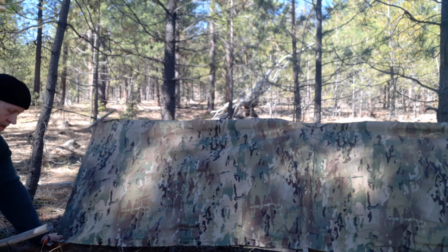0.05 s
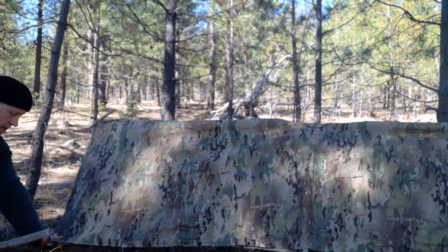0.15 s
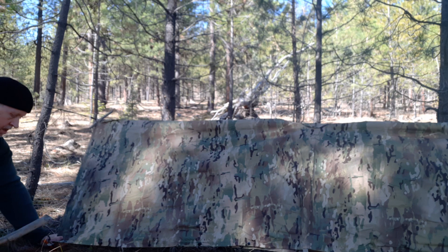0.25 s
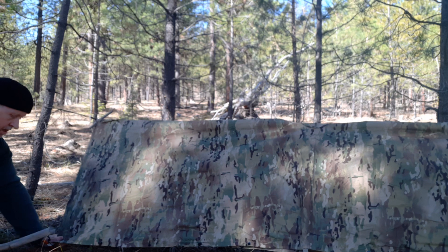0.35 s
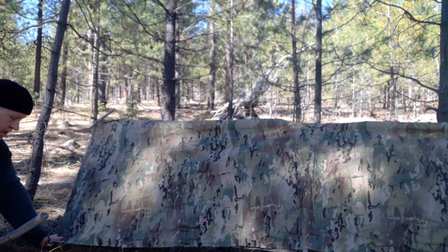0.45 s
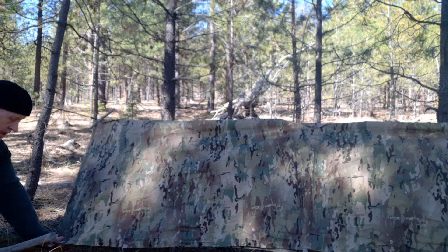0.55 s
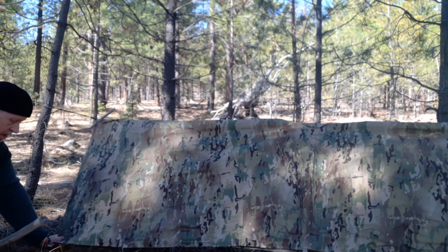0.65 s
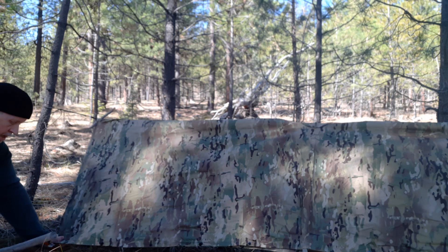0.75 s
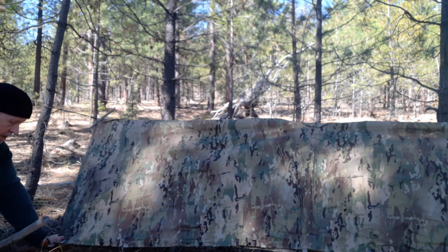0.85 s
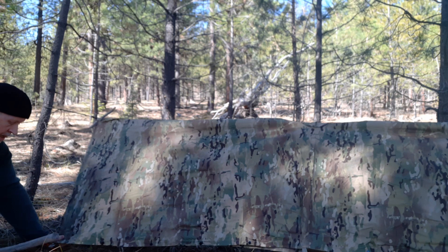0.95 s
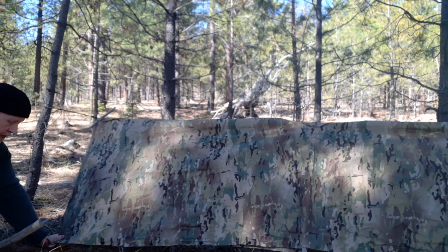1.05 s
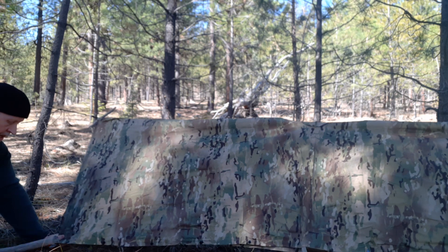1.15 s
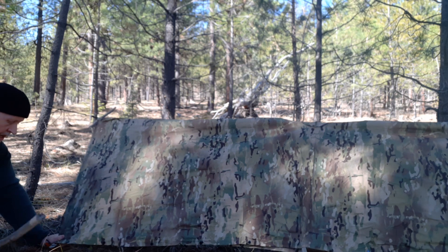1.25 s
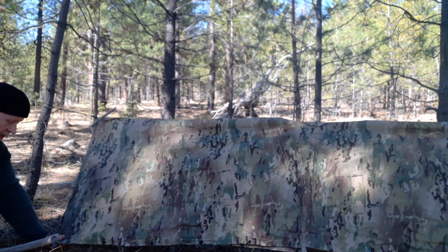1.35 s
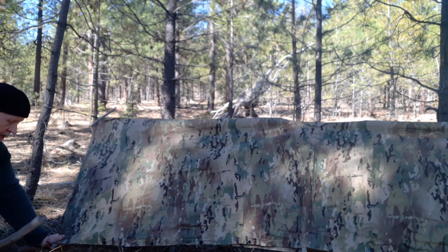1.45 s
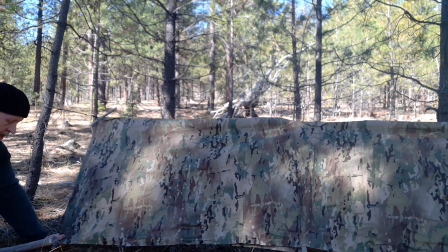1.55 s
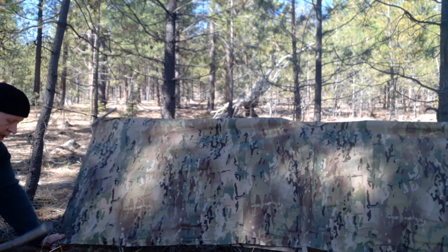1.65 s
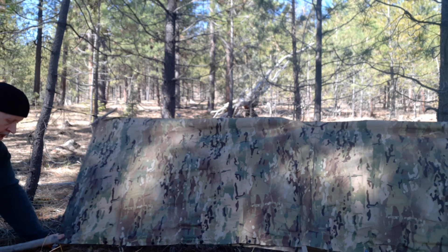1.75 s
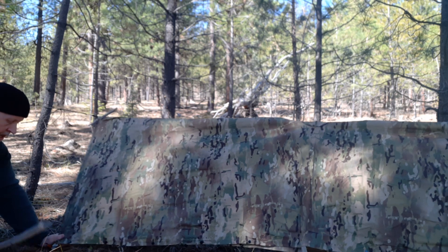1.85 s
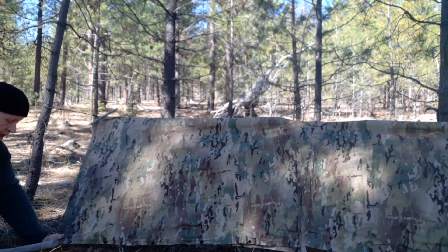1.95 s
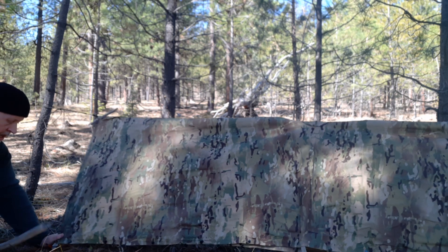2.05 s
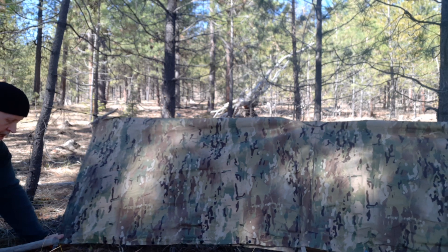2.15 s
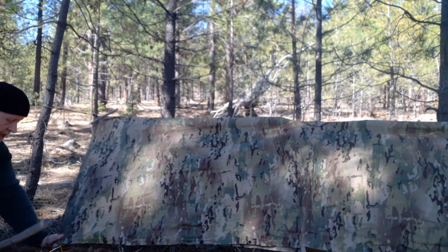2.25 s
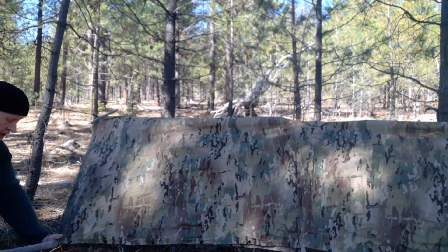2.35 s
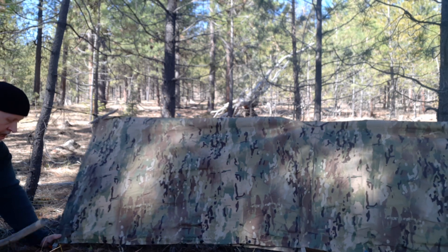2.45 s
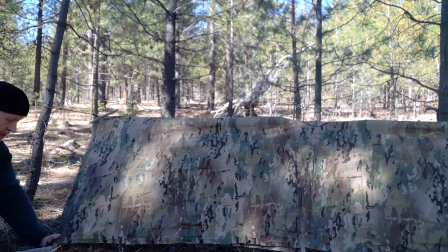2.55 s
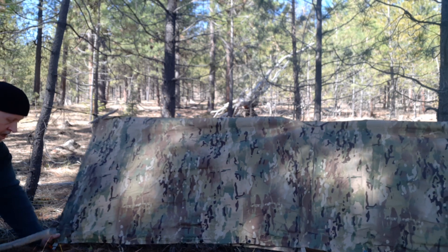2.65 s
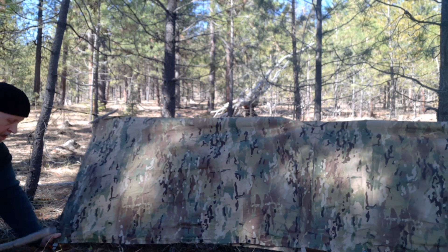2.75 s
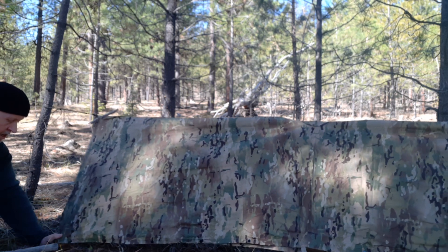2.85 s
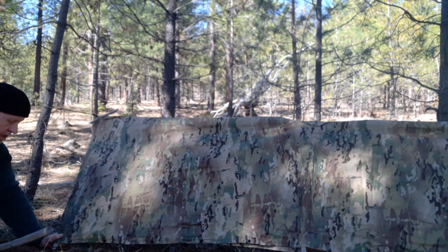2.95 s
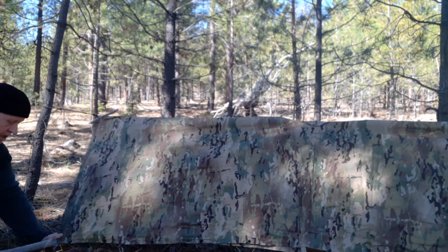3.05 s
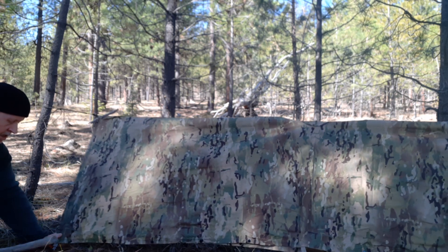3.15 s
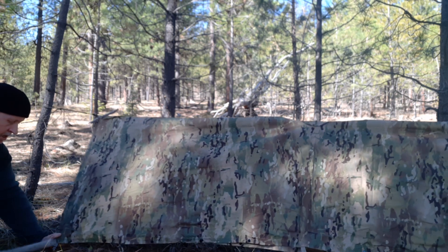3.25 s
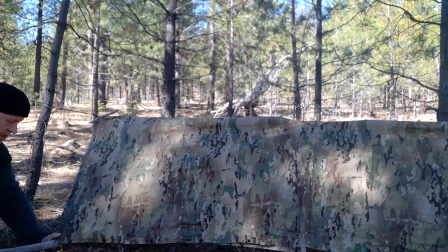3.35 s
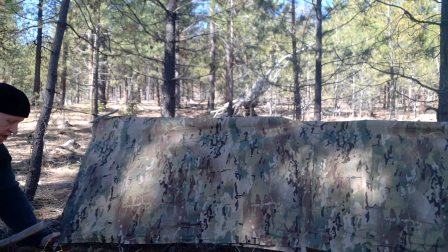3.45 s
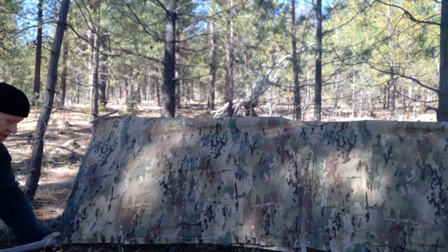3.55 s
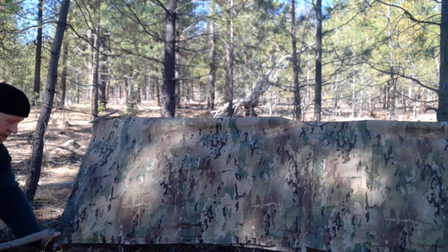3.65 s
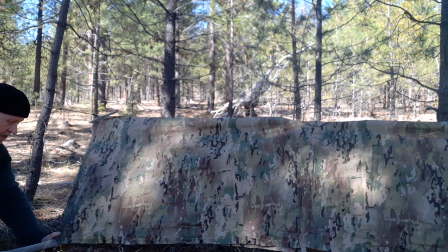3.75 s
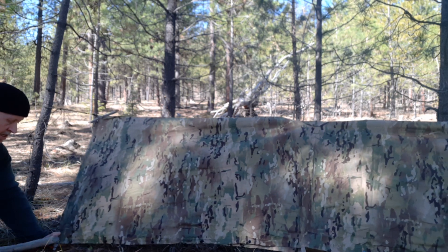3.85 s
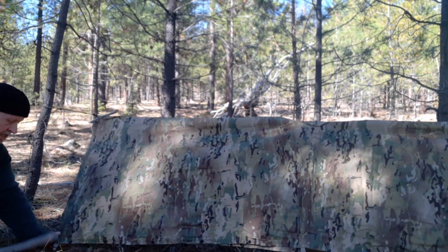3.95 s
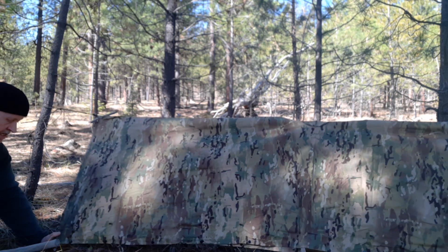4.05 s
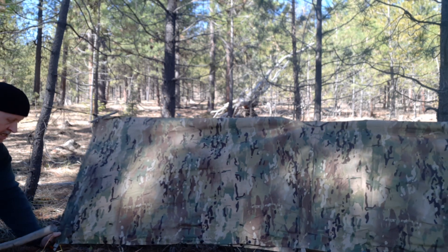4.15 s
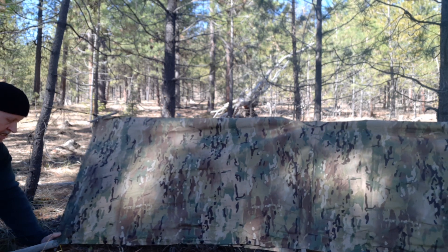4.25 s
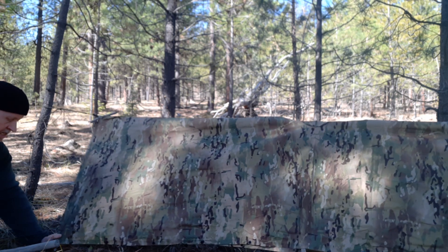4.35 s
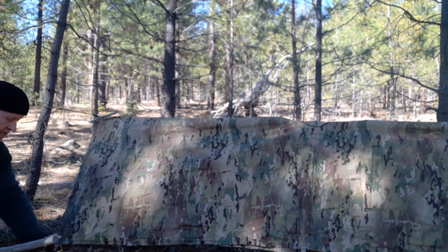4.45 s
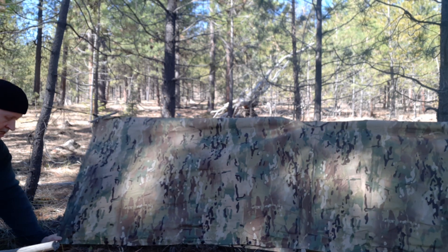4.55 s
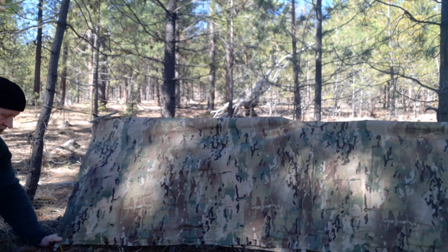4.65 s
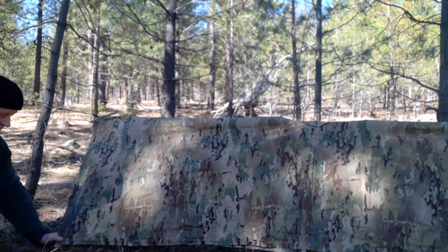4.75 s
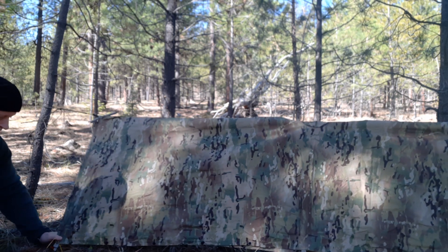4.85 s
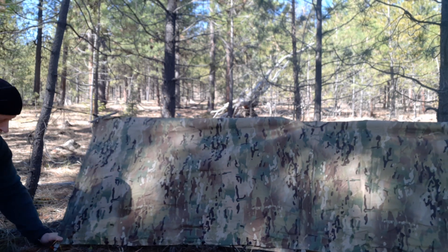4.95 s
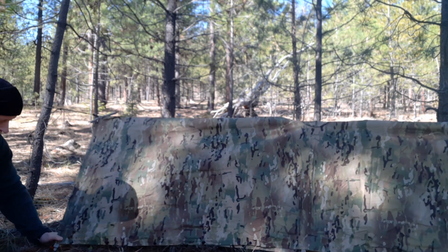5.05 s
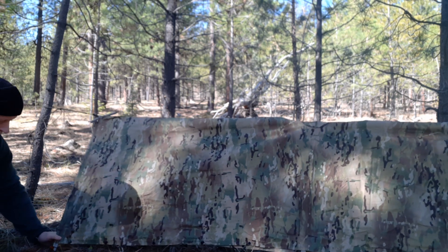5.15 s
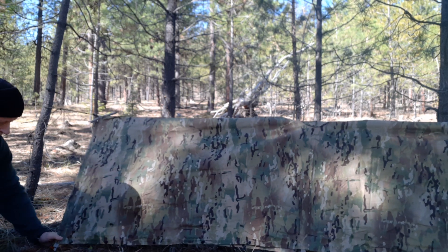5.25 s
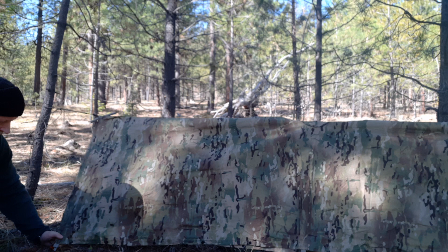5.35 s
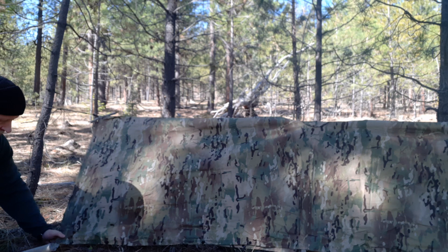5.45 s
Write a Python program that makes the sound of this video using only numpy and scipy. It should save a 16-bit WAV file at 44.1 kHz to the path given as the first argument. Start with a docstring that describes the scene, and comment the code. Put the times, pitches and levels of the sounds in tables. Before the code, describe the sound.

Quick, steady wooden knocks with sharp cracks and dull thuds drive a tent stake into the ground over a light wind rumble.

```python
"""Quick, even knocks, a little to the right: a wooden club drives a tent stake into forest soil.
Each blow is a wooden knock, a splintery crack and a falling thud of the ground. Harder contacts are
shorter, and the crack tightens once the stake sits deep. A shifting overtone colours the crack, the
stake rings briefly, grit patters down and the club sometimes drops back in a light tap. Trunks scatter
a short echo, wind buffets and thumps the microphone, a sleeve swishes and cloth rustles faintly."""
import sys
import numpy as np
from scipy import signal
from scipy.fft import rfft, irfft, next_fast_len
from scipy.io import wavfile
from scipy.ndimage import map_coordinates

SR = 44100
rng = np.random.default_rng(int(sys.argv[2]) if len(sys.argv) > 2 else 0)


def waveform_to_disk(signal):
    """Save audio, clipped to [-1, 1], as 16-bit WAV at the path in sys.argv[1]."""
    frames = np.transpose(np.atleast_2d(signal))
    scaled = np.clip(frames, -1, 1) * 32767
    samples = np.round(scaled).astype(np.int16)
    wavfile.write(sys.argv[1], SR, samples)


N = 242991
LENGTH = 16384  # samples in one blow
T = np.arange(LENGTH) / SR
HZ = np.fft.rfftfreq(LENGTH, 1 / SR)
SOFT_BELOW_DB = 1.5  # a contact with less hardness than this counts as soft

# blows of the club; hardness is how much louder the crack is than the knock
# (time [s], knock level [dB], hardness [dB], thud level [dB], overtone of the stake [Hz])
BLOWS = [(0.37, -53.5, 5, -52.5, 5850), (0.567, -38.5, 3.5, -49, 5550), (0.7717, -37, 1, -46, 5600),
         (0.971, -37.5, 1.5, -44, 5400), (1.155, -34, 1, -41.5, 5290), (1.3547, -35, 3.5, -43, 5260),
         (1.5506, -34, 3, -43.5, 5800), (1.734, -34, 4, -43, 5490), (1.9381, -33, 3.5, -39, 5500),
         (2.1405, -35, 3.5, -41.5, 5330), (2.3438, -34, 3.5, -37, 5100), (2.5735, -38, 0, -35.5, 4400),
         (2.5864, -40.5, 3, -44, 3680), (2.8398, -45.5, 1, -38, 5540), (3.0908, -37, 7.5, -40.5, 6850),
         (3.3144, -36, 9.5, -41.5, 6920), (3.5477, -34.5, 4.5, -37.5, 5670),
         (3.7805, -36.5, 9, -42.5, 5290), (4.0215, -35, 6.5, -39, 5500), (4.2743, -34, 7.5, -38, 5250)]
# tone of the dry hiss of cloth, grit and needles (frequency [Hz], level [dB])
RUSTLE = [(1470, -55), (2500, -24), (3980, -7), (5690, -3), (7590, -1.5), (8600, -16.5), (11700, -1),
          (15000, 1), (16000, -31.5)]


def hammering(contact_t60=0.038, shorter_per_db=0.29, tap_t60=0.0054, firm_from_s=2.7):
    """The club hits the stake, first in loose soil, then in firm; harder contacts are shorter."""
    # light taps as the club glances off or drops back (time [s], knock level [dB], hardness [dB])
    rebounds = [(0.3723, -55.5, 9.5), (0.633, -63.5, -1), (1.5545, -48.5, 13.5), (1.78, -57, -11.5),
                (1.969, -53.5, -3), (2.184, -50.5, -3), (2.37, -48, -3), (3.3397, -48, 0.5),
                (3.7939, -48, 2), (4.085, -60, -12)]
    hits = []
    for s, knock_db, hardness_db, thud_db, overtone_hz in BLOWS:
        t60 = contact_t60 * np.exp(-shorter_per_db * max(hardness_db, SOFT_BELOW_DB))
        hits.append((s, t60, knock_db, hardness_db, thud_db, overtone_hz))
    for s, knock_db, hardness_db in rebounds:
        overtone_hz = min(BLOWS, key=lambda blow: abs(blow[0] - s))[-1]  # from the nearest blow
        thud_db = knock_db - hardness_db / 2  # a glancing tap shakes the soil less
        hits.append((s, tap_t60, knock_db, hardness_db, thud_db, overtone_hz))
    out = np.zeros((2, N))
    lead = 256  # samples of room ahead of each hit
    for s, *hit in hits:
        add(out, s - lead / SR, np.roll(strike(s > firm_from_s, *hit), lead, axis=1))
    return out


def strike(firm, t60, knock_db, hardness_db, thud_db, overtone_hz):
    """One contact knocks on the wood, cracks and snaps at the stake's head and shakes the soil."""
    tones = wood_tones(firm, hardness_db, overtone_hz)
    crush = contact(t60, rise=0.035, impact=0, bite=amp(-7))
    push = contact(t60 * 0.086, rise=0, impact=2.8)
    snap_db = (-9.5 if firm else -7) - 0.84 * max(SOFT_BELOW_DB - hardness_db, 0)  # soft hits snap less
    gains = amp(knock_db + np.array([0, hardness_db, hardness_db + snap_db]))  # knock, crack, snap
    ground = amp(thud_db) * thud(firm)
    blow = sum(g * set_energy(part) for g, part in zip(gains, irfft(tones * [push, crush, crush])))
    # the echo mixes all directions, so only the tone of the wood is left in it
    radiated = sum(g * set_energy(part) for g, part in zip(gains, irfft(tones)))
    return direct(blow + ground) + forest_echo(radiated + ground) + amp(knock_db) * stake_ring(firm)


def contact(t60, rise, impact, bite=0, bite_at=0.05, rub_db=-24, rub_t60=0.04):
    """Spectrum of a blow's force: an impact, fibres crushing, then the shaft rubbing into the soil."""
    build_up = 1 - np.exp(-T / (rise * t60 + 1 / SR))  # rise and bite_at are shares of t60
    force = rng.standard_normal(LENGTH) * (fade(T, t60) + amp(rub_db) * fade(T, rub_t60)) * build_up
    force[0] += impact
    fibres_give_way = bite * np.linalg.norm(force) * np.exp(-2j * np.pi * HZ * bite_at * t60)
    return rfft(force) + fibres_give_way


def wood_tones(firm, hardness_db, overtone_hz, knock_top_hz=2370):
    """How strongly club and stake answer at each frequency, for the knock, the crack and the snap."""
    # notes at which club and stake ring (frequency [Hz], width [Hz], level [dB])
    wood_notes = [(687, 170, -9), (930, 130, -0.5), (1076, 610, -3.5), (1453, 79, -1), (1505, 75, 3),
                  (1977, 425, 4.5), (2082, 89, 6)]
    # tone of the crack in loose soil and in firm soil (frequency [Hz], level [dB])
    crack_loose = [(1600, -53), (2380, -3), (2660, -7.5), (3000, 0.5), (3230, -6.5), (3750, -1),
                   (4420, -4.5), (5300, -3), (6300, -1.5), (7900, -6), (8600, -20.5), (11000, -46)]
    crack_firm = [(1500, -42.5), (2300, -5), (2850, -10.5), (3200, -7), (4200, -8), (5000, -4.5),
                  (6200, -6.5), (7100, -2.5), (7900, -10.5), (8600, -22), (11000, -57.5)]
    # tone of the high snap (frequency [Hz], level [dB])
    snap_tone = [(6500, -46), (8700, -9), (10000, -3), (11400, 4), (13500, -3), (15500, -5), (16800, -28)]
    wood = sum((-1) ** k * amp(db) * resonance(hz, width) for k, (hz, width, db) in enumerate(wood_notes))
    # the blunt club face cannot drive the knock's high notes
    blunt = signal.freqs(*signal.butter(8, 1, analog=True), HZ / knock_top_hz)[1]
    slope = 1 + 1j * HZ  # a positive power of this brightens, a negative one deepens
    knock = wood * blunt * slope ** (-0.11 if firm else 0.23)
    overtone = amp(-4) * resonance(overtone_hz, width_hz=280)
    crack = struck_tone(crack_firm if firm else crack_loose) * (1 + overtone)
    if firm:
        crack *= slope ** (0.0523 * hardness_db)  # harder hits are brighter
    return np.array([knock, crack, struck_tone(snap_tone)])


def thud(firm, rise_s=0.006, detune=0.05):
    """The ground swings a few times, falling in pitch as the push spreads into it."""
    # notes of the earth packed against the shaft (frequency [Hz], level [dB], time to fade 60 dB [s])
    soil_notes = [(270.2, -4, 0.036), (394, -18.5, 0.049)]
    first_hz, last_hz, glide_s, t60 = (265, 45, 0.012, 0.053) if firm else (235, 58, 0.01, 0.082)
    pitch = last_hz + (first_hz - last_hz) * np.exp(-T / glide_s)
    pitch *= 1 + detune * rng.standard_normal()
    swings = np.sin(2 * np.pi * np.cumsum(pitch) / SR) * fade(T, t60)
    for hz, db, note_t60 in soil_notes:
        hz *= 1 + detune * rng.standard_normal()
        swings -= amp(db) * np.sin(2 * np.pi * hz * T) * fade(T, note_t60)
    return set_energy(swings * (1 - np.exp(-(T / rise_s) ** 2)))


def stake_ring(firm, firm_db=-6, scatter_db=0.5, count=160):
    """Crowds of close notes hang on after the blow as a dry rasp; firm soil makes them quieter."""
    # the stake's lingering ring (centre [Hz], spread [Hz], level [dB], time to fade 60 dB [s])
    clusters = [(2037, 110, -17.5, 0.17), (2870, 170, -25, 0.23), (5130, 230, -22, 0.3)]
    out = np.zeros((2, LENGTH))
    for hz, spread_hz, db, t60 in clusters:
        notes_hz = hz + spread_hz * rng.standard_normal(count)
        strengths = rng.standard_normal((2, count)) + 1j * rng.standard_normal((2, count))
        spectrum = np.zeros((2, len(HZ)), complex)
        spectrum[:, np.searchsorted(HZ, notes_hz)] = strengths
        out += amp(db + scatter_db * rng.standard_normal()) * unit(irfft(spectrum)) * fade(T, t60)
    return amp(firm_db * firm) * out * (1 - T / T[-1])


def direct(x, lag_s=0.00021):
    """The blow reaches the left side of the microphone later and duller."""
    # balance between the sides (frequency [Hz], left minus right [dB])
    shade = [(100, -3.5), (900, -5.5), (1600, -4), (4400, -6.5), (15000, -13)]
    delay = np.exp(-2j * np.pi * HZ * np.array([[lag_s], [0]]))
    return irfft(rfft(x) * delay * panned(along(shade, HZ)))


def forest_echo(x, rise_s=0.00054, near_gain=4.5, near_t60=0.016, uneven_db=2.5):
    """The tarp and ground echo at once, the trunks later, in clumps that are new for every blow."""
    # how long the echo lasts (frequency [Hz], time to fade 60 dB [s])
    echo_times = [(150, 0.42), (700, 0.21), (5000, 0.19), (13000, 0.17)]
    # how strong the echo is (frequency [Hz], level [dB])
    echo_tone = [(100, -25), (300, -6.5), (700, -0.5), (1600, -11.5), (3500, -6), (7000, -8.5), (15000, -7)]
    # how alike its left and right sides are (frequency [Hz], likeness [0 to 1])
    likeness = [(300, 0.99), (640, 0.82), (1400, 0.44), (3000, 0.024)]
    hz, t, hiss = signal.stft(rng.standard_normal((2, LENGTH)), SR, nperseg=256)
    clumps = amp(uneven_db * (rng.standard_normal(len(t)) + rng.standard_normal((len(hz), 1))))
    decay = fade(t, along(echo_times, hz)[:, None])
    tail = signal.istft(hiss * clumps * decay, SR, nperseg=256)[1][:, :LENGTH]
    tail *= (1 - np.exp(-(T / rise_s) ** 2)) * (1 + near_gain * fade(T, near_t60))
    spread = np.arccos(along(likeness, HZ)) / 2
    mid, side = rfft(tail / np.linalg.norm(tail[0])) * [np.cos(spread), np.sin(spread)]
    return irfft(rfft(x) * amp(along(echo_tone, HZ)) * [mid + side, mid - side])


def grit(count=6, mean_flight_s=0.019, t60=0.0049, pan_db=-6):
    """Bits of soil and dry needles patter down after each blow, the later ones softer."""
    envelope = np.zeros(N)
    for s, knock_db, *_ in BLOWS:
        for flight in rng.gamma(2, 1 / 2, count):
            add(envelope, s + mean_flight_s * flight, amp(knock_db - 17 - 3 * flight) * fade(T, t60))
    return envelope * noise(RUSTLE) * panned(pan_db)


def wind(gain_db=-2, eddy_db=5, eddies_per_s=16):
    """Swirls of air buffet each microphone opening on its own; strong gusts add a higher churn."""
    # gusts (time [s], level before gain_db [dB], left minus right [dB])
    gusts = [(0.0, -37, -18.5), (0.11, -64, 4), (0.21, -44.5, -14), (0.32, -68.5, 5), (0.74, -52.5, -32),
             (0.86, -42, -29), (1.15, -43, -8.5), (1.45, -52, -8.5), (2.09, -51, 10.5), (2.37, -52, -14.5),
             (2.5, -40, 8), (2.91, -48.5, 2), (3.97, -60, 2), (4.41, -53.5, -8.5), (4.46, -46.5, -34.5),
             (4.56, -83.5, 8), (4.66, -48, -28), (4.92, -44.5, -33), (4.97, -79.5, -1.5),
             (5.06, -36, -14.5), (5.13, -71, -9), (5.27, -43.5, -38.5), (5.51, -54, -1)]
    # tone of the deep buffeting and of a strong gust's small swirls (frequency [Hz], level [dB])
    buffet_tone = [(22, -23), (38, -10), (52, 4), (75, -1), (100, -5.5), (135, -21.5), (210, -34.5),
                   (400, -45), (900, -110)]
    churn_tone = [(60, -25), (120, 2), (200, -11.5), (300, -21), (600, -59)]
    buffet_db, pan_db = curves(gusts)
    eddies = amp(eddy_db * np.array([wobble(eddies_per_s), wobble(eddies_per_s)]))
    peak_db = buffet_db.max()
    churn_db = peak_db - 14.5 + 2.2 * (buffet_db - peak_db)  # drops away fast as the wind eases
    buffet = amp(buffet_db) * unit(eddies * noise(buffet_tone))
    churn = amp(churn_db) * unit(eddies * noise(churn_tone))
    return panned(pan_db) * (amp(gain_db) * (buffet + churn) + wind_thumps())


def wind_thumps(half_cycles=0.61):
    """Each large swirl of air gives the microphone one short swing of pressure."""
    # large swirls (time [s], level [dB], pitch [Hz])
    swirls = [(0.844, -37.5, 72), (0.877, -36, 75), (0.901, -37, 90.5), (1.008, -32, 72.4),
              (1.035, -38.5, 116), (1.06, -41.5, 62), (2.384, -35.5, 68), (2.489, -33.5, 88),
              (2.732, -44.5, 59.9)]
    out = np.zeros(N)
    t = T - T[-1] / 2
    for s, db, hz in swirls:
        envelope = amp(db) * np.exp(-(hz * t / half_cycles) ** 2)
        add(out, s + t[0], envelope * np.sin(2 * np.pi * (hz * t + rng.random())))
    return out


def sleeve(swish_db=-74, lead_s=0.026, grain_db=2.1, pan_db=-4):
    """The sleeve swishes ahead of five quick blows and brushes past on two wide swings."""
    # brushes of the sleeve (time [s], half length [s], level [dB])
    brushes = [(3.491, 0.042, -56), (3.727, 0.031, -66.5)]
    # tone of a swish and of a brush (frequency [Hz], level [dB])
    swish_tone = [(2400, -24), (3450, -6), (4400, -14), (9000, -23.5)]
    brush_tone = [(200, -11), (480, 2.5), (1000, -2.5), (2200, -15.5), (3800, -7.5), (7600, -3),
                  (8700, -16)]
    swishing = amp(swish_db) * sum(swell(s - lead_s, half_s=0.059) for s, *_ in BLOWS[3:8])
    brushing = sum(amp(db) * swell(s, half_s) for s, half_s, db in brushes)
    weave = unit(amp(grain_db * wobble(200)))
    return weave * panned(pan_db) * (swishing * noise(swish_tone) + brushing * noise(brush_tone))


def cloth(grain_db=2, pan_db=-6):
    """Sleeve and tarp rub with a fine hiss that breaks into tiny crackles."""
    # loudness of the rustle (time [s], level [dB])
    rustle_levels = [(0.0, -72.5), (0.32, -84), (0.52, -71), (1.64, -74.5), (2.32, -81.5), (2.65, -70.5),
                     (2.86, -100), (3.84, -78), (4.53, -78.5), (4.66, -68), (4.73, -56.5), (4.8, -67.5),
                     (5.0, -75), (5.35, -73.5), (5.46, -64)]
    rustle_db, = curves(rustle_levels)
    grains = amp(grain_db * (wobble(83) + wobble(700)))
    return amp(rustle_db) * panned(pan_db) * unit(noise(RUSTLE) * grains)


def needles(gain_db=-6, t60=0.026, pan_db=-6):
    """Dry needles break under the hand with tiny ticks."""
    # ticks (time [s], level before gain_db [dB])
    ticks = [(0.0866, -54.5), (5.471, -43), (5.481, -46.5)]
    envelope = np.zeros(N)
    for s, db in ticks:
        add(envelope, s, amp(db + gain_db) * fade(T, t60))
    return envelope * noise(RUSTLE) * panned(pan_db)


def forest_hush(level_db=-76, pan_db=-2.5):
    """The forest air makes a quiet, steady hiss."""
    # tone of the hush (frequency [Hz], level [dB])
    air_tone = [(120, -29.5), (200, -1), (612, -2), (1080, -11.5), (6000, -17.5), (8580, -29),
                (13800, -11.5), (16000, -17.5)]
    return amp(level_db) * noise(air_tone) * panned(pan_db)


def amp(db):
    """Turn decibels into a gain."""
    return 10 ** (np.asarray(db) / 20)


def unit(x):
    """Scale to an average power of 1."""
    return x / np.sqrt(np.mean(x ** 2) + 1e-20)


def set_energy(x):
    """Scale to the energy of 10 ms at power 1."""
    return x * np.sqrt(SR / 100 / np.sum(x ** 2))


def fade(t, t60):
    """Die away by 60 dB every t60 seconds."""
    return amp(-60 * t / t60)


def along(points, hz):
    """Read between (frequency, value) points, spaced as the ear hears pitch."""
    point_hz, values = np.transpose(points)
    return np.interp(np.log(hz + 1), np.log(point_hz + 1), values)


def curves(rows):
    """One value per sample for each column after the time."""
    s, *columns = np.transpose(rows)
    return [np.interp(np.arange(N) / SR, s, column) for column in columns]


def wobble(rate):
    """A smooth curve through rate random points a second."""
    return map_coordinates(rng.standard_normal(int(N * rate / SR) + 4), [np.arange(N) * rate / SR])


def swell(s, half_s):
    """A smooth rise and fall around a time."""
    return np.exp(-((np.arange(N) / SR - s) / half_s) ** 2)


def resonance(hz, width_hz):
    """Spectrum of one note that rings and fades."""
    return 1j * HZ * width_hz / (hz * hz - HZ * HZ + 1j * HZ * width_hz)


def struck_tone(points):
    """Spectrum with the given tone whose sound comes as early as it can (minimum phase)."""
    cepstrum = irfft(np.log(amp(along(points, HZ))))
    cepstrum[1:LENGTH // 2] *= 2
    cepstrum[LENGTH // 2 + 1:] = 0
    return np.exp(rfft(cepstrum))


def filtered(x, response):
    """Give each frequency of a whole track its own gain."""
    size = next_fast_len(N + SR // 2)
    return irfft(rfft(x, size) * response(np.fft.rfftfreq(size, 1 / SR)), size)[..., :N]


def noise(tone):
    """Noise of power 1 with the given tone, unrelated left and right."""
    return unit(filtered(rng.standard_normal((2, N)), lambda hz: amp(along(tone, hz))))


def panned(pan_db):
    """Left and right gains of average power 1; positive is to the left."""
    gains = amp(np.array([[1], [-1]]) * pan_db / 2)
    return gains / np.sqrt(np.mean(gains ** 2, axis=0))


def add(track, s, sound):
    """Mix a sound into a track at a time."""
    start = max(round(s * SR), 0)
    track[..., start:start + sound.shape[-1]] += sound[..., :N - start]


def scene():
    """The work at the stake over the quiet hush of the forest."""
    return hammering() + grit() + wind() + sleeve() + cloth() + needles() + forest_hush()


def record(dry, top_hz=16350):
    """The camera cuts off the very highest treble."""
    return filtered(dry, lambda hz: 1 / np.sqrt(1 + (hz / top_hz) ** 160))


dry = scene()
out = record(dry)
waveform_to_disk(out)
```